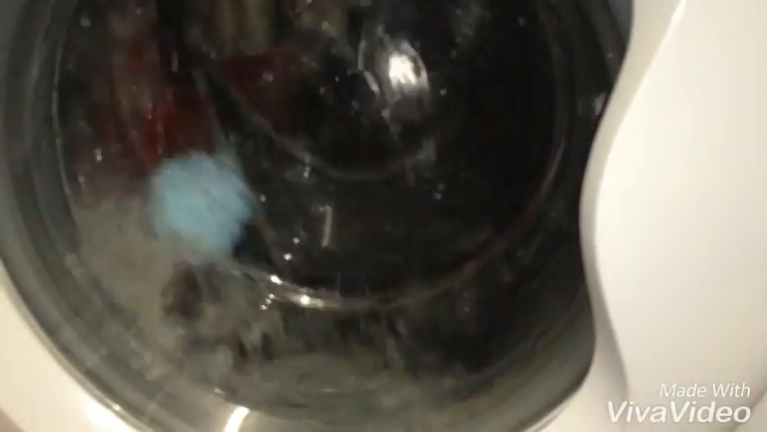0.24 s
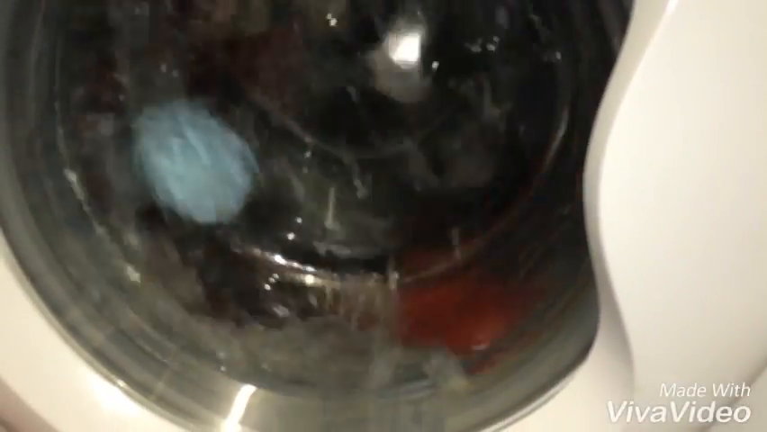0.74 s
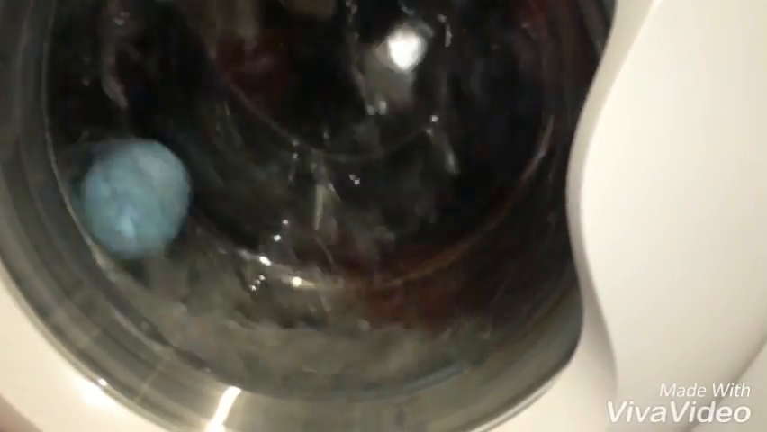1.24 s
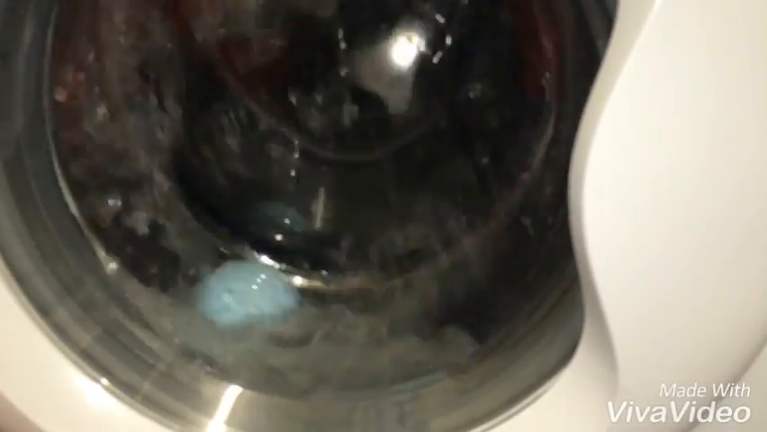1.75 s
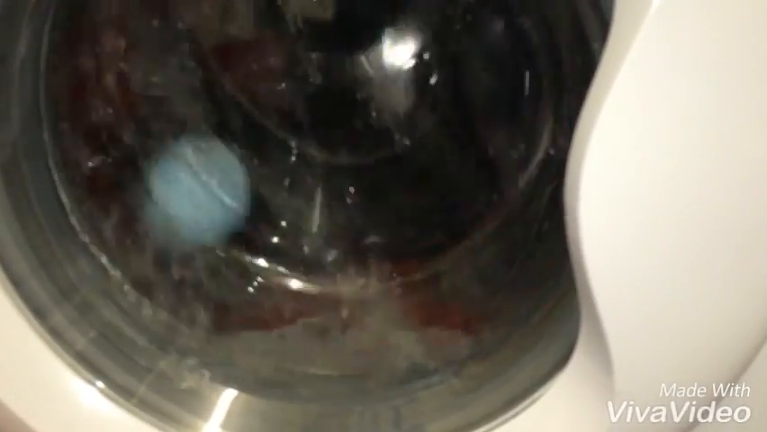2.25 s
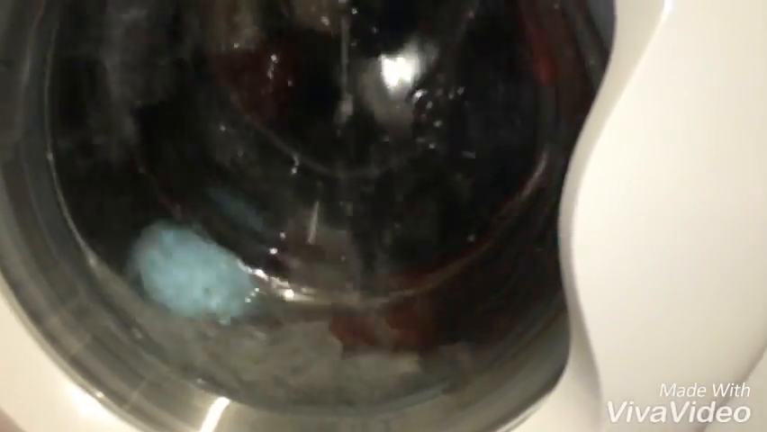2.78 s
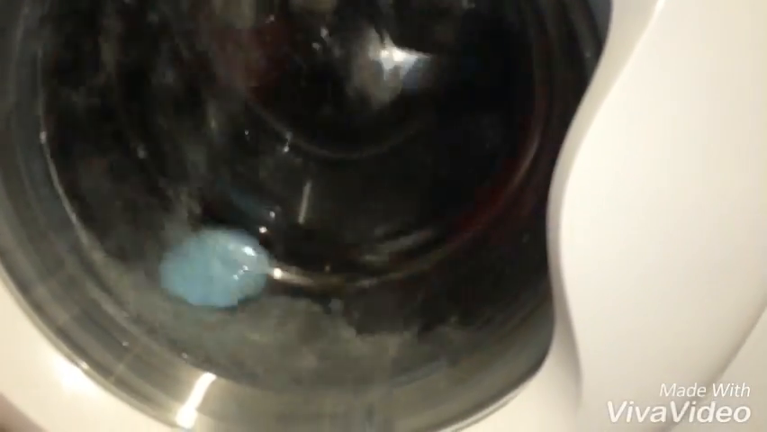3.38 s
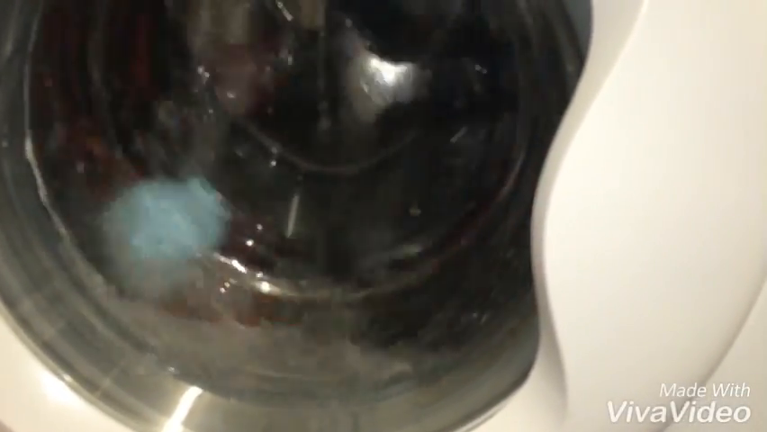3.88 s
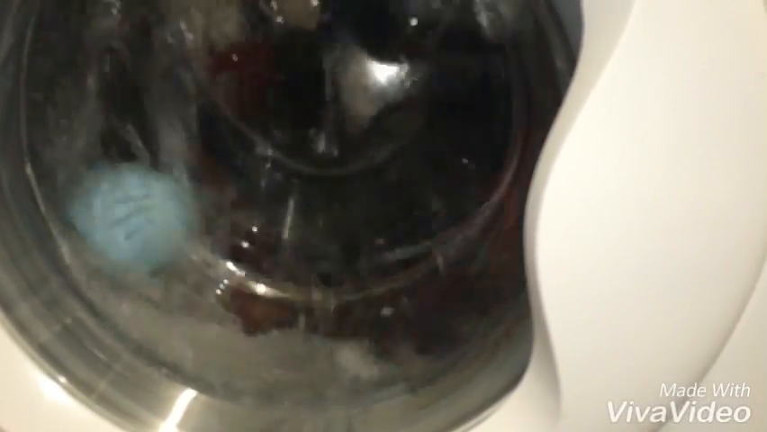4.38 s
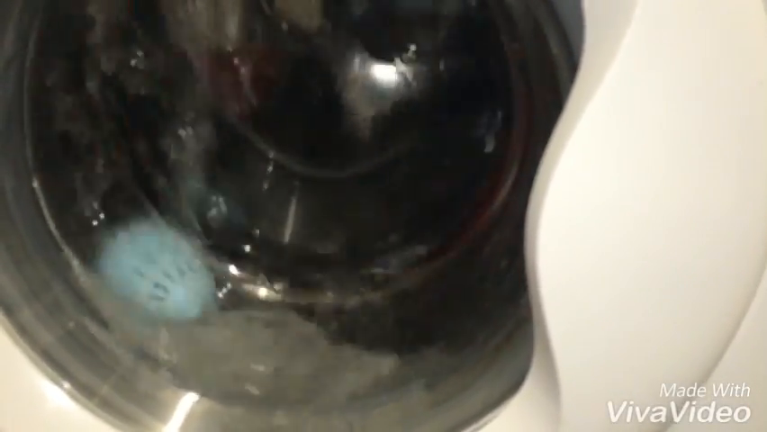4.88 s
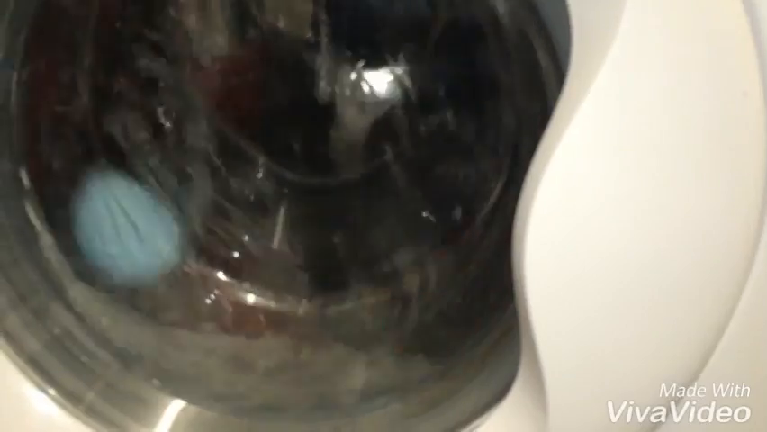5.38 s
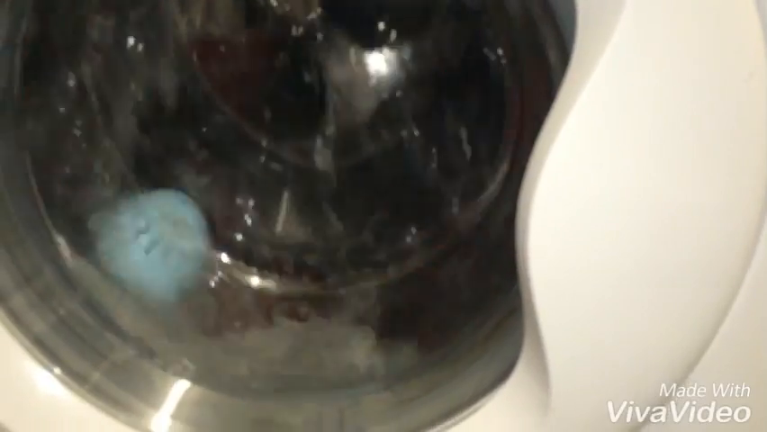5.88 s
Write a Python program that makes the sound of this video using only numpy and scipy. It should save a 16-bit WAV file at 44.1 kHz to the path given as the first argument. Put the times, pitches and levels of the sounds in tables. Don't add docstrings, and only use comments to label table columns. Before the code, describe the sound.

A front-loading washer turns wet laundry in a laundry room, heard in mono close to the door. From 0 seconds low water churn, ringing slosh, fine spray and a faint, high motor whine run throughout. A wave swells and breaks over the door around 0.3, with clustered gurgles and droplets; heavy, boomy thuds land near 0.35, 0.6, 0.8 and 1.15, with a plastic ball knocking the glass. Buttons tick, a zip pull clinks and zip teeth scrape the steel. From about 1.3 to 2 the load is lighter; softer, uneven thuds follow from 2 to 3.7, with scattered bubbles and a brighter clink near 2.3. From 4.05 hard drops and ball knocks return, notably about 4.2, 4.5, 5.0, 5.2, 5.5 and 5.95, shaking the small parts. Splashes flare near 4.7 and 5.4, and the washing continues to the end, just past 6.

```python
import sys
import numpy as np
from scipy import signal
from scipy.io import wavfile

SR = 44100
rng = np.random.default_rng(int(sys.argv[2]) if len(sys.argv) > 2 else 0)


def invert_db(level):
    return 10 ** (np.asarray(level, dtype=float) / 20)


def store_pcm(level_fs):
    pcm = np.round(np.clip(level_fs, -1, 1) * 32767).astype(np.int16)
    wavfile.write(sys.argv[1], SR, np.atleast_2d(pcm).T)


N = 270333


def rms_one(x):
    return x / np.sqrt(np.mean(x ** 2) + 1e-20)


def bandpass(x, low_hz, high_hz):
    return signal.sosfilt(signal.butter(2, [low_hz, high_hz], "band", fs=SR, output="sos"), x)


def in_time(rows):
    start_s, level_db = np.transpose(rows)
    return np.interp(np.arange(N) / SR, start_s, level_db)


def drift(rate_hz):
    r = np.exp(-80 * np.pi * rate_hz / SR)
    white = rng.standard_normal(N // 40 + 2002)
    slow = signal.lfilter([1], [1, -2 * r, r * r], white)[2000:]
    return np.interp(np.arange(N) / 40, np.arange(len(slow)), rms_one(slow))


def ring(clicks, hz, t60):
    r, w = invert_db(-60 / (t60 * SR)), 2 * np.pi * hz / SR
    return signal.lfilter([0, np.sin(w)], [1, -2 * r * np.cos(w), r * r], clicks + 1e-18)


def strikes(times, sizes):
    clicks = np.zeros(N)
    places = np.clip(np.round(np.asarray(times) * SR).astype(int), 0, N - 1)
    np.add.at(clicks, places, sizes)
    return clicks


def grains(per_s, spread_db):
    unevenness = np.minimum(rng.exponential(1, N), 5)
    sizes = invert_db(spread_db * unevenness) * rng.choice([-1, 1], N)
    return sizes * (rng.random(N) < per_s / SR)


def banded_noise(spectrum, patchy_db, surge_db):
    hz, level = np.transpose(spectrum)
    edges = 22 * 2 ** (np.arange(29.5) / 3)
    white = rng.standard_normal((2, N))
    surge = surge_db * drift(15)
    out = 0
    for k, (low, high) in enumerate(zip(edges, edges[1:])):
        if hz[0] < high and low < hz[-2] * 1.3:
            band = bandpass(white[k % 2], low, high)
            centre_db = np.interp(np.log(low * high) / 2, np.log(hz), level, left=-60)
            out = out + invert_db(centre_db + surge + patchy_db * drift(20.3)) * band
    return rms_one(out)


def bubbles(low_hz, high_hz, per_s, cycles):
    born = grains(per_s * invert_db(3.2 * drift(6.5)), spread_db=2.0)
    dealt = rng.integers(0, 12, N)
    out = 0
    for k, hz in enumerate(np.geomspace(low_hz, high_hz, 12)):
        out = out + ring(born * (dealt == k), hz, cycles / hz) / hz
    return rms_one(out)


def ticks(table, share, t60, width, rise_s):
    length = 3000
    out, t = np.zeros(N + length), np.arange(length) / SR
    shape = (1 - np.exp(-t / rise_s)) * invert_db(-60 * t / t60)
    shape = shape / shape.max()
    shape = shape + 0.12 * np.interp(t - 0.013, t, shape, left=0)
    for (s, peak_db, hz), white in zip(table, rng.standard_normal((len(table), length))):
        splash = rms_one(bandpass(white, hz / (1 + width), min(hz * (1 + width), 16000)))
        tone = np.sin(2 * np.pi * hz * t)
        tick = (1 - share) * tone + share * 0.33 * splash
        out[round(s * SR):][:length] += invert_db(peak_db) * shape * tick
    return out[:N]


def shaken(table, over_crack_db, hz):
    rows = list(table) + [(s, crack_db + over_crack_db) for s, _, _, crack_db in BALL_KNOCKS]
    pitches = hz * (1 + 0.0234 * rng.standard_normal(len(rows)))
    return [(*row, pitch)[:3] for row, pitch in zip(rows, pitches)]


def swell_db(s, db, rise_s, fall_s):
    late = np.arange(N) / SR - s
    return db * np.exp(np.where(late < 0, late / rise_s, -late / fall_s))


# start_s, level_db
ROLLING = [(0.0, -40), (1.84, -45), (2.15, -42.5), (2.73, -46), (2.94, -42), (3.14, -39.5), (3.62, -45),
           (3.74, -37.5), (3.94, -44), (4.37, -42.5), (4.81, -42), (5.24, -42), (5.94, -48), (6.13, -39)]


def roll_db():
    level_db = in_time(ROLLING)
    return level_db - level_db.mean()


# start_s, suspension_db, tub_db, panel_db,
# lean_db (tilt to the upper modes of each family)
HEAVY_DROPS = [(0.0153, -42, -18, -14, -2), (0.3465, -9.5, -7.5, -8, 0.6), (0.569, -11, -7, -20, 2),
               (0.7775, -8.5, -7.5, -5, 1.6), (1.1353, -7.5, -7.5, -11.5, 0), (1.258, -11, -14.5, -25, 1.5),
               (1.8443, -40, -50, -21.5, -0.5), (2.0246, -15.5, -22, -33.5, 0),
               (2.0751, -20, -15, -29, -0.5), (2.0933, -9, -15, -24, -1.2), (2.2467, -33, -18, -18, 0),
               (2.7301, -13, -15, -18.5, -0.4), (2.8067, -10, -19.5, -29, -1.5),
               (2.8525, -15.5, -20.5, -40, 0), (2.9635, -11.5, -11.5, -24.5, -1.1),
               (3.288, -19, -13, -20.5, 0.5), (3.575, -14, -19, -42, 0.1), (3.6792, -10, -14, -29, 0.5),
               (4.054, -17.5, -13, -12, .3), (4.2035, -4.5, -9, -16, -1.3), (4.4804, -7.5, -11.5, -16, .3),
               (4.4905, -10, -30, -20, -4.5), (4.579, -23, -17.5, -13, 0), (4.961, -11, -18.5, -19, -1),
               (5.0462, -10.5, -13, -11.5, 1.2), (5.2222, -7.5, -9, -11, -1), (5.2512, -17, -13, -23, 1),
               (5.363, -35, -19.5, -19.5, -2), (5.524, -8.5, -7.5, -11, -1.5),
               (5.9564, -7.5, -8.5, -23, -0.1)]
# start_s, suspension_db, tub_db, panel_db
LIGHT_FLOPS = [(0.0, -20, -14, -28), (0.121, -39, -31, -41), (0.2568, -30, -29, -25),
               (0.9411, -24, -20, -38), (1.3782, -25, -21, -24), (1.605, -38, -37, -32),
               (1.6665, -29, -33, -29), (1.754, -30, -33, -44), (1.9, -38, -41, -42),
               (2.1853, -29, -28, -39), (2.333, -31, -29, -43), (2.435, -32, -35, -34),
               (2.5, -36, -43, -42), (2.561, -46, -38, -44), (2.63, -36, -37, -40), (2.926, -36, -35, -41),
               (3.082, -30, -23, -32), (3.181, -46, -42, -38), (3.435, -40, -35, -33),
               (3.778, -35, -34, -42), (3.8647, -40, -24, -33), (3.961, -42, -41, -50),
               (4.2179, -16, -17.5, -31), (4.3311, -26, -21, -23.5), (4.681, -38, -46, -40),
               (4.7678, -20, -18.5, -30), (5.62, -33, -26, -51), (5.69, -27, -36, -49),
               (5.741, -40, -33, -46), (5.8145, -29, -30.5, -47), (5.9825, -24, -16, -27),
               (6.086, -27, -26, -32)]
# pitch_hz, level_db, t60_s, swing (sign at the microphone)
SPRING_ROCKING = (36, -15.5, .09, 1)
# pitch_hz, level_db, t60_s, swing
TUB_MODES = [(63, -18.8, 0.265, 1), (71, -14.1, 0.313, -1), (78, -6.4, 0.13, -1), (98, -21.1, 0.231, 1),
             (120, -0.9, 0.182, 1), (134, -9.5, 0.236, -1)]
# pitch_hz, level_db, t60_s, swing
PANEL_MODES = [(169, -22.2, .3, -1), (202, -21.8, .3, 1), (225, -18.7, .3, 1), (249, -20.7, .3, 1),
               (293, -13.5, .084, -1), (354, -22.6, .127, -1), (374, -19, .155, -1), (470, -15.5, .023, 1)]
PANEL_LAG_S, TUB_LEAD_S = 0.00093, 0.0005


def thuds():
    drops = np.array(HEAVY_DROPS + [(*row, 0) for row in LIGHT_FLOPS])
    modes = [SPRING_ROCKING, *TUB_MODES, *PANEL_MODES]
    scatter_db = rng.normal(0, 1.2, (len(drops), len(modes)))
    tumble = invert_db(-50 + roll_db()) * grains(per_s=200, spread_db=2.0)
    out = np.zeros((2, N))
    for k, (hz, level_db, t60, swing) in enumerate(modes):
        panel = int(k > len(TUB_MODES))
        family = 3 if panel else 1 + (hz > 105)
        lean = 1 if hz > (75, 125, 260)[family - 1] else -1
        start_s = drops[:, 0] + (PANEL_LAG_S if panel else -TUB_LEAD_S)
        size_db = drops[:, family] + lean * drops[:, 4] + scatter_db[:, k]
        blows = strikes(start_s, invert_db(size_db)) + tumble
        out[panel] += swing * invert_db(level_db) * ring(blows, hz, t60)
    tub = signal.lfilter(*signal.butter(2, 330, fs=SR), out[0])
    soft = np.exp(-2 * np.pi * 1200 / SR)
    return tub + signal.lfilter([1 - soft], [1, -soft], out[1])


def wave_db():
    return swell_db(0.32, 4.5, rise_s=0.59, fall_s=0.11)


# start_s, level_db
WALL_SPLASHES = [(0.19, 4.5), (0.9, -1.5), (1.14, 2), (1.6, 1), (1.97, 3.5), (2.3, 0.5), (2.53, 3),
                 (3.08, -0.5), (4.22, 1), (4.68, 4.5), (4.96, 1), (5.23, 2), (5.38, 4), (5.53, 4),
                 (5.96, 2)]


def splash_db():
    return sum(swell_db(s, db, rise_s=0.0033, fall_s=0.059) for s, db in WALL_SPLASHES)


# pitch_hz, level_db (per Hz)
CHURN_SPECTRUM = [(15, -62), (25, -33), (54, -1), (172, 3), (204, 6.5), (263, -10.5), (305, -8.5),
                  (425, -5), (492, -6.5), (600, -34), (780, -53), (1320, -120)]


def churn():
    level_db = -45 + 0.8 * roll_db() + wave_db()
    return invert_db(level_db) * banded_noise(CHURN_SPECTRUM, patchy_db=3.0, surge_db=0.5)


# pitch_hz, width_hz, level_db
DRUM_MODES = [(532.5, 40, 3.5), (709.6, 60, 7), (878, 42, 4), (1113, 54, 5.5), (1400, 14.5, 8),
              (2560, 108, -4.5), (3493, 210, -9.5), (4680, 67, -24), (5970, 160, -18), (7100, 49, -21),
              (11000, 190, -46)]


def shell():
    water = rng.standard_normal(N) + 0.63 * rms_one(grains(per_s=90, spread_db=4))
    out = 0
    for hz, width, level_db in DRUM_MODES:
        out = out + invert_db(level_db) * np.sqrt(width) * rms_one(ring(water, hz, 4.6 / width))
    return rms_one(out)


# pitch_hz, level_db (per Hz)
SLOSH_SPECTRUM = [(210, -30), (350, 3.5), (433, -17), (487, -12), (637, -14), (694, 14), (805, -6.5),
                  (1320, -4), (1560, -9.5), (2610, -14.5), (3060, -19.5), (3520, -33), (4500, -37),
                  (5850, -60), (9900, -120)]
# start_s, level_db
SWILLING = [(0.0, -39), (0.17, -44), (0.38, -38), (0.61, -43.5), (1.55, -43), (1.66, -42), (2.05, -42),
            (3.74, -44), (4.18, -44), (5.04, -43), (5.82, -42.5), (6.13, -45)]


def slosh():
    water = banded_noise(SLOSH_SPECTRUM, patchy_db=1.5, surge_db=1.35)
    water = water + invert_db(-4.0) * shell()
    water = water + invert_db(-6) * bubbles(540, 2300, per_s=500, cycles=34)
    swill_db = in_time(SWILLING)
    level_db = -43.5 + 0.61 * (swill_db - np.median(swill_db))
    return invert_db(level_db + 0.12 * wave_db() + 0.2 * splash_db()) * water


def patter():
    return rms_one(bandpass(grains(per_s=49, spread_db=6.5), 2500, 13000))


# pitch_hz, level_db (per Hz)
SPRAY_SPECTRUM = [(1760, -40), (3000, -9), (3530, 2), (3750, 1), (5610, -8), (7300, -2.5), (7810, -7),
                  (13100, -14), (15000, -19)]


def spray():
    water = banded_noise(SPRAY_SPECTRUM, patchy_db=0.9, surge_db=0.45)
    water = water + invert_db(-9.5) * bubbles(4570, 15500, per_s=120, cycles=79)
    water = water + invert_db(-17) * patter()
    water = water + invert_db(-15) * bubbles(7600, 15000, per_s=260, cycles=110)
    return invert_db(-58 + 0.83 * wave_db() + splash_db()) * water


# pitch_hz, level_db (rms)
MOTOR_LINES = [(2200, -65.5), (3199, -70), (4079, -88), (4226, -77), (4275, -68), (4324, -79), (4374, -98),
               (8061, -97), (8256, -92), (8305, -90), (8451, -92)]


def motor():
    t, wow = np.arange(N) / SR, drift(1.0)
    out = np.zeros(N)
    for hz, level_db in MOTOR_LINES:
        level = np.sqrt(2) * invert_db(level_db + 1.2 * drift(3))
        out += level * np.sin(2 * np.pi * hz * t + wow * hz / 4000)
    return out


# start_s, level_db (peak), pitch_hz
DROPLETS = [(0.001, -42, 11000), (1.55, -48, 10500), (2.05, -54, 12000), (2.57, -45, 13000),
            (2.66, -50, 12000), (0.189, -32, 8700), (0.188, -51, 11900), (0.2498, -47, 9800),
            (0.2828, -37, 14000), (0.9068, -43, 8800), (1.1638, -43, 8700), (1.6122, -44, 13000),
            (1.6232, -45, 10840), (1.9754, -49, 8980), (2.3077, -50, 11000), (2.3196, -43, 11000),
            (2.3191, -47, 13700), (2.4698, -46, 9460), (3.0869, -41, 9500), (3.0869, -43, 13300),
            (4.2353, -43, 10500), (4.5111, -45, 10440), (4.6548, -45, 10800), (4.6932, -45, 8660),
            (4.6942, -49, 13400), (4.8783, -52, 13300), (4.9916, -45, 10500), (5.025, -50, 12900),
            (5.253, -45, 9110), (5.454, -44, 13400), (5.6645, -48, 13500), (5.9579, -48, 12100),
            (5.9873, -41, 10600)]


def droplets():
    return ticks(shaken(DROPLETS, 0.5, hz=9500), share=0.5, t60=0.022, width=0.11, rise_s=0.00035)


# start_s, level_db
# (peak), pitch_hz
AIR_POCKETS = [(0.003, -24, 594), (0.011, -38, 935), (0.066, -23, 493), (0.182, -45, 1230),
               (0.197, -22.5, 805), (0.213, -29, 606), (0.255, -21.5, 704), (0.269, -32, 700),
               (0.299, -34, 816), (0.408, -21, 1400), (0.3485, -31, 1690), (0.407, -21.5, 980),
               (0.503, -28, 790), (1.656, -24, 1070), (2.174, -35, 770), (3.59, -24, 1360),
               (3.805, -42, 705), (4.869, -30, 804), (5.124, -34, 910), (5.876, -35, 1180),
               (1.033, -48, 1210), (1.44, -29.5, 720), (2.376, -33, 684), (2.418, -28.5, 703),
               (2.465, -31, 1370), (2.55, -34, 1180), (2.65, -36, 1150), (2.175, -38, 1900),
               (2.548, -35, 2020), (3.35, -31, 1150), (3.43, -37, 1400), (3.41, -33, 680),
               (3.645, -37, 510), (3.682, -37, 710), (3.91, -29, 720), (4.905, -36, 1320),
               (4.964, -26, 880), (5.098, -29, 1180), (5.226, -27, 883), (5.25, -30, 890),
               (5.605, -30, 733), (5.809, -39, 874)]


def gurgles():
    return ticks(AIR_POCKETS, share=0.58, t60=0.035, width=0.2, rise_s=0.0018)


# start_s, level_db (peak)
PULL_CLINKS = [(0.188, -41), (0.8794, -42), (1.7504, -44), (1.9724, -43), (2.3256, -35.5), (2.596, -50),
               (3.0869, -46), (3.8092, -43), (4.6384, -50), (4.6937, -39.5), (5.3807, -49), (1.8512, -48),
               (2.545, -49), (3.2365, -46), (5.1, -51), (5.4, -43)]


def clinks():
    return ticks(shaken(PULL_CLINKS, -2, hz=7060), share=0.4, t60=0.03, width=0.12, rise_s=0.0003)


# start_s, level_db (peak)
BUTTON_TICKS = [(0.2029, -32), (0.3481, -29), (0.473, -38), (0.9073, -27.5), (1.387, -34), (1.622, -29),
                (2.0946, -35), (2.7531, -40), (2.8085, -40), (2.864, -34.5), (3.0749, -36.5),
                (3.2964, -34.5), (3.39, -43), (3.7758, -39), (4.555, -34), (4.8235, -38), (4.8792, -31.5),
                (5.037, -36.5), (5.442, -34), (5.652, -38), (0.4075, -37), (1.5668, -43), (1.6771, -38),
                (1.7928, -49), (1.922, -47), (2.2149, -40), (2.4249, -43), (2.545, -35), (3.0016, -45),
                (3.5743, -43), (4.8589, -37), (5.267, -41), (5.455, -42)]


def buttons():
    return ticks(shaken(BUTTON_TICKS, 6, hz=2600), share=0.25, t60=0.026, width=0.08, rise_s=0.0004)


# start_s, high_modes_db, low_modes_db, crack_db
BALL_KNOCKS = [(0.3485, -20.5, -35, -45.5), (0.57, -34, -26.5, -56), (0.781, -23.5, -17.5, -51),
               (1.1366, -33, -27, -49.5), (4.0558, -26, -47, -55), (4.21, -35, -27, -64),
               (4.4824, -48, -30, -52), (4.582, -35, -32, -61), (4.9627, -44, -32, -49.5),
               (5.049, -31, -26, -50.5), (5.2238, -47, -27.5, -50.5), (5.248, -46, -27.5, -52),
               (5.3654, -40, -43, -53), (5.5256, -44, -28, -51), (5.9569, -46, -34, -51.5)]
# pitch_hz, level_db, t60_s
DOOR_MODES = [(430, 0, 0.03), (549, -1, 0.03), (579, -13, 0.081), (900, -16, 0.027), (1176, -7.5, 0.062),
              (1400, 6.5, 0.016), (1830, -3, 0.019), (2160, -3.5, 0.01)]


def knocks():
    table = np.array(BALL_KNOCKS)
    scatter_db = rng.normal(0, 3.2, (len(table), len(DOOR_MODES)))
    glass = np.zeros(N)
    for k, (hz, level_db, t60) in enumerate(DOOR_MODES):
        column = 2 if hz < 900 else 1
        size_db = table[:, column] + level_db - 3.5 + scatter_db[:, k]
        glass += ring(strikes(table[:, 0], invert_db(size_db)), hz, t60)
    glass = signal.sosfilt(signal.butter(2, 1700, fs=SR, output="sos"), glass)
    hits = strikes(table[:, 0], invert_db(table[:, 3] + 5.0))
    fade = signal.lfilter([1], [1, -invert_db(-60 / (0.084 * SR))], hits)
    return glass + fade * rms_one(bandpass(rng.standard_normal(N), 1800, 5000))


# start_s, level_db (peak), pitch_hz
ZIP_TICKS = [(0.409, -36.5, 4470), (0.5362, -42, 5910), (0.671, -31, 5000), (0.9073, -40, 4430),
             (1.3, -37, 5070), (1.5284, -49, 4680), (1.85, -44, 6000), (2.2076, -37, 3880),
             (3.33, -42, 5800), (3.73, -38, 6100), (4.235, -39, 5570), (5.985, -40, 5630),
             (3.1064, -39, 4140), (4.2238, -40, 4230), (4.625, -36, 3920), (4.694, -35.5, 5620),
             (5.3807, -36, 5630), (5.4028, -38, 3850), (5.4266, -40, 5660), (1.53, -37.5, 4600),
             (1.99, -48, 5800), (2.4688, -49, 5990), (4.3799, -46, 5980), (4.5111, -44, 5690),
             (4.6548, -49, 5020), (4.7701, -42, 5710), (4.9916, -48, 5500)]


def zips():
    return ticks(shaken(ZIP_TICKS, -16, hz=4960), share=0.65, t60=0.03, width=0.14, rise_s=0.00038)


def scene():
    water = churn() + slosh() + spray()
    small_parts = droplets() + clinks() + buttons() + zips()
    return (thuds() + water + motor() + gurgles() + small_parts + knocks())[None]


def roll_off(x):
    return signal.sosfilt(signal.butter(12, 15360, fs=SR, output="sos"), x)


def record(dry):
    mix = signal.sosfilt(signal.butter(1, 12, "high", fs=SR, output="sos"), dry)
    mix = signal.sosfilt(signal.ellip(10, 0.5, 60, 15450, fs=SR, output="sos"), mix)
    return roll_off(mix)


dry = scene()
out = record(dry)
store_pcm(out)
```